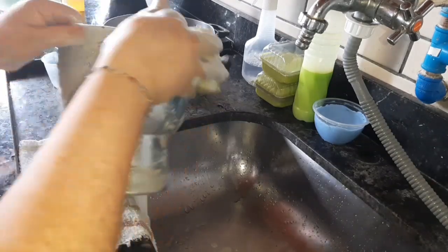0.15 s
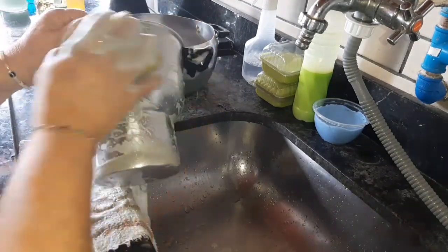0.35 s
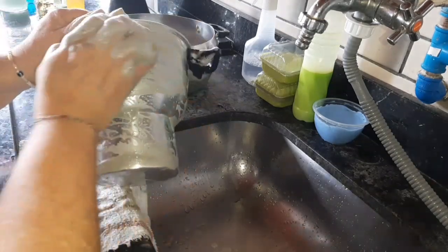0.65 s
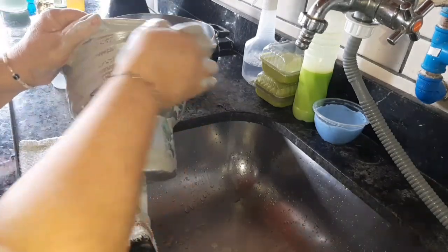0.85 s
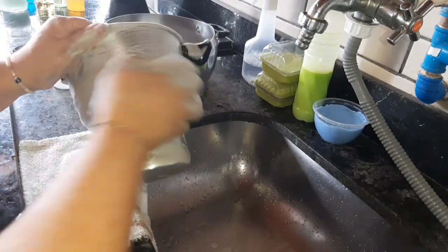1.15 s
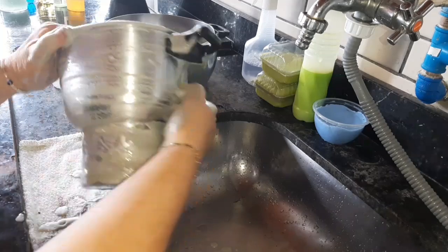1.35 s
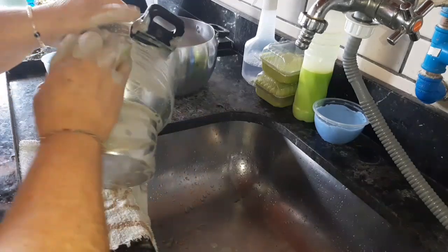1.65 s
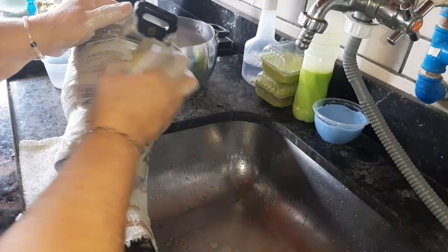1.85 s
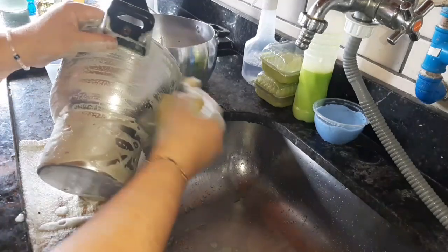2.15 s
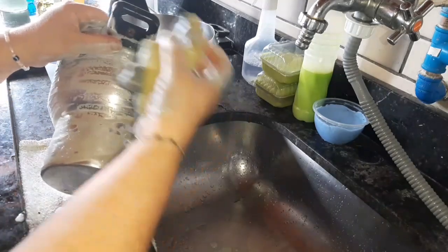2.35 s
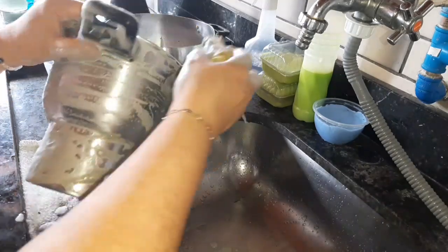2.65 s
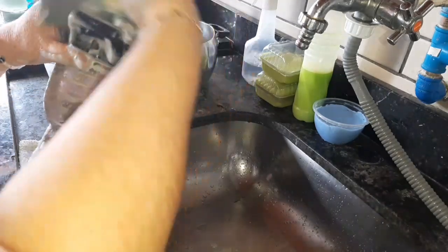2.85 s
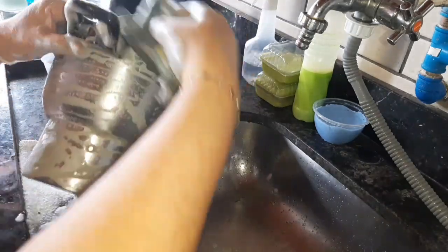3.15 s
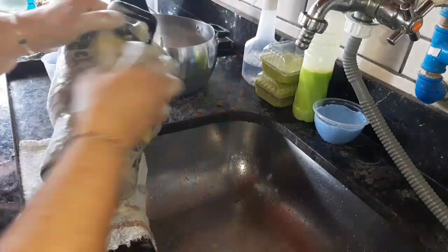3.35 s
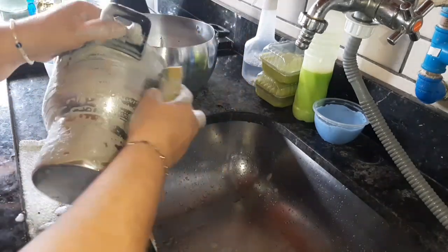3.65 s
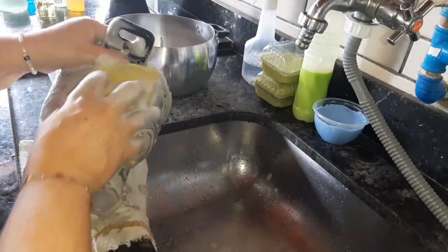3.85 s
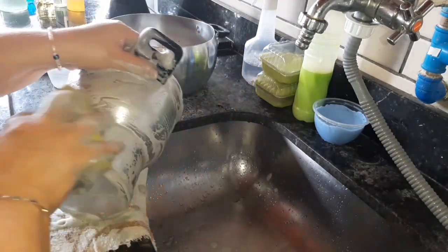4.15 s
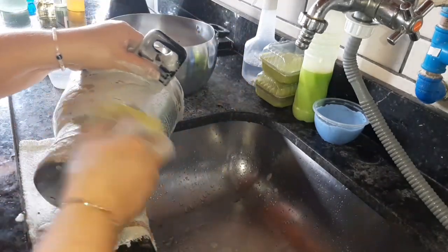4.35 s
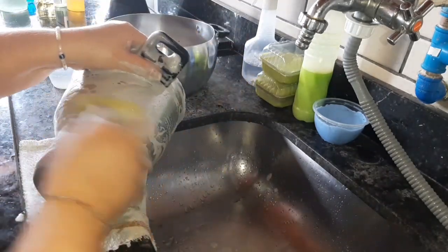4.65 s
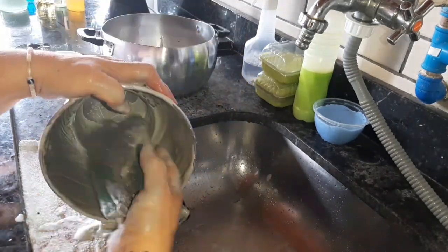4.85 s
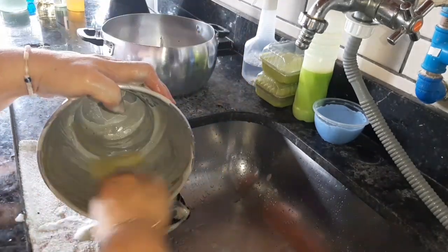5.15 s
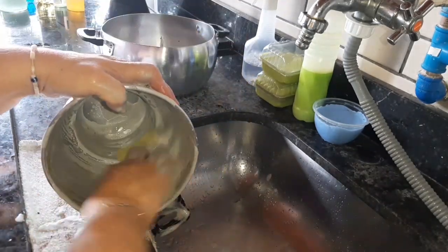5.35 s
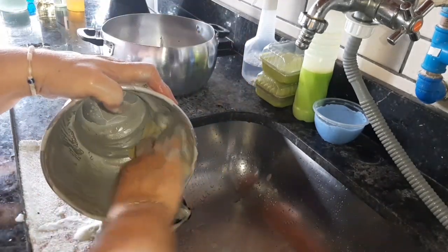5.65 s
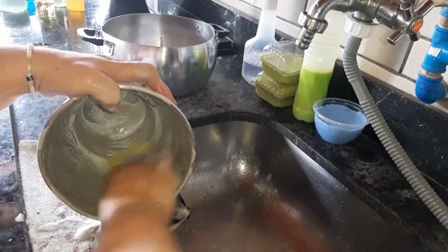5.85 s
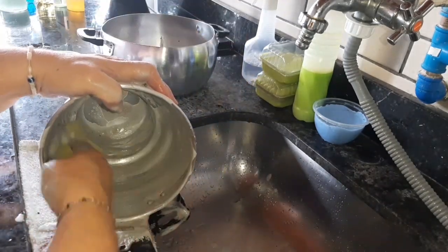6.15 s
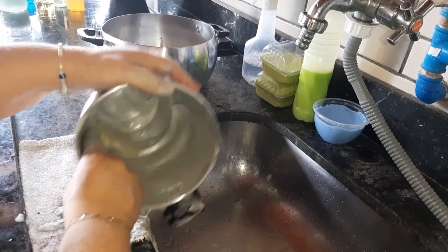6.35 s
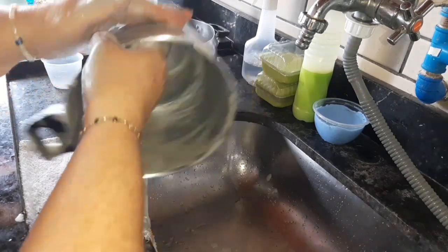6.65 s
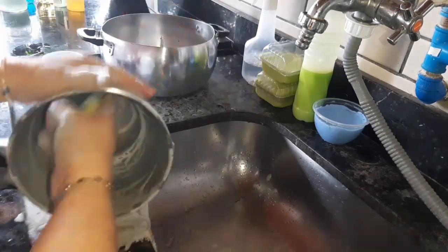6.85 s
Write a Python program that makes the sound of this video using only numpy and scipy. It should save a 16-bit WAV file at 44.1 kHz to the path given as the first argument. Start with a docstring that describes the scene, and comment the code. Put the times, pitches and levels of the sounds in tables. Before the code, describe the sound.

Quick, raspy scouring of a damped metal pot, several strokes a second, with short scratches and frequent hollow clanks. Around the middle the strokes thin out to handling and knocks, then return. A tiny gap precedes steadier, louder hissing strokes with a hollow pot resonance and fewer clanks. The pot is finally turned and set down hard. Close stereo microphone in a small, hard-walled kitchen.

```python
"""Steel wool hisses in quick uneven strokes on a wet metal pot at a kitchen sink, close to a two-port microphone.
Friction is filtered noise: dense random slips of the wires, a judder of the pot wall, short scratches.
The counter rumbles under the arm; the pot rocks on it and clanks, each blow exciting damped shell modes.
The pot is put down at the end with a heavy knock, a sum of counter modes; tiled walls add a short tail."""
import sys
import numpy as np
from scipy import signal
from scipy.fft import rfft, irfft
from scipy.io import wavfile

SR = 44100
rng = np.random.default_rng(int(sys.argv[2]) if len(sys.argv) > 2 else 0)


def wrap_up_sound(samples):
    """Save the sound to the file named by the first command line argument, as 16-bit audio."""
    columns = np.atleast_2d(samples).T
    # keep every value between -1 and 1, then stretch to whole-number steps
    tamed = np.clip(columns, -1, 1)
    steps = np.round(tamed * 32767).astype(np.int16)
    wavfile.write(sys.argv[1], SR, steps)


N = 308170  # samples

# Table levels are relative: source trims, fluctuations and the port response act after them.
# strokes of the pad: (middle [s], length [s], wire hiss level [dB], coarse rasp above the hiss [dB])
STROKES = [(0, 0.14, -60.5, 10), (0.277, .21, -53, 8), (0.437, 0.15, -48, 1.5), (0.593, .15, -46, 0.5),
           (0.772, .17, -45.5, 3.5), (0.972, 0.18, -47, 2.5), (1.172, 0.34, -46.5, -0.5),
           (1.452, 0.19, -51.5, 4), (1.616, 0.18, -49.5, 4.5), (1.78, 0.16, -45.5, 3.5),
           (1.93, .14, -45.5, 5.5), (2.085, 0.15, -45, 2.5), (2.243, .11, -63, 10),
           (2.588, 0.26, -59, 12.5), (2.882, .27, -63, 10.5), (3.104, 0.22, -56, 12.5),
           (3.403, .16, -51, 7), (3.587, .16, -45, 3.5), (3.825, .35, -49, 5.5), (4.12, .25, -45.5, 2),
           (4.353, 0.17, -45, 2.5), (4.528, 0.15, -45.5, 4), (4.675, 0.12, -47, 1), (4.81, 0.25, -59, 4),
           (5.121, 0.059, -49.5, 4), (5.253, .19, -42, 0.5), (5.441, 0.16, -42.5, -0.5),
           (5.603, 0.16, -44.5, 1.5), (5.79, 0.13, -43, 2.5), (5.938, .13, -43.5, 0.5),
           (6.146, 0.21, -41.5, 0.5), (6.352, 0.15, -51.5, 5), (6.48, 0.22, -59.5, 10.5),
           (6.683, 0.25, -66, 11), (6.98, 0.11, -51.5, 10)]
# wires scratching in the pot: (frequency [Hz], density [dB per Hz])
WIRE_SPECTRUM = [(600, -3), (1500, -1), (2200, -2), (3500, -4), (5500, -3.5), (7000, -2.5), (8800, -4.5),
                 (10000, -2), (11500, 0.5), (13500, -1), (15500, -2)]
# the hollow stirred by scouring inside the pot: (time [s], level relative to the hiss [dB])
HOLLOW_LEVEL = [(0, -29), (4.7, -17), (5.1, -14.5), (5.45, -1), (5.75, -13), (6.3, -3.5), (6.9, 10)]
# resonance of that hollow: (frequency [Hz], density [dB per Hz])
HOLLOW_SPECTRUM = [(100, -55), (290, -32), (370, 7.5), (440, 6), (560, -3.5), (720, -25), (2000, -40)]
# pad bearing on the pot: (time [s], rubbing level of the wall [dB])
PAD_PRESSURE = [(0.0, -48.5), (0.54, -51), (0.93, -41), (1.15, -48), (1.4, -51.5), (1.73, -40),
                (2.02, -39.5), (2.24, -53.5), (3.35, -52), (3.68, -47.5), (4.49, -48), (4.75, -55.5),
                (5.12, -55.5), (5.27, -52), (6.01, -50), (6.99, -55.5)]
# rubbed pot wall: (frequency [Hz], density [dB per Hz])
WALL_SPECTRUM = [(130, -29), (280, 5), (430, 0.5), (620, -0.5), (850, -3), (1200, -10), (1800, -9),
                 (2600, -21), (4000, -21.5), (8000, -24.5), (16000, -70)]
# arm leaning on the counter: (time [s], rumble level [dB])
ARM_LEAN = [(0, -51.5), (.85, -45), (1.25, -49), (1.95, -40.5), (2.3, -46.5), (2.8, -47.5), (3.7, -44),
            (4.6, -45.5), (4.9, -55.5), (5.2, -47), (6.3, -49), (6.9, -52)]
# pushed counter: (frequency [Hz], density [dB per Hz])
RUMBLE_SPECTRUM = [(20, -44), (35, -19), (58, -6), (100, 1), (145, -4), (195, -17), (300, -26), (600, -47),
                   (2000, -88)]
# bursts of friction, from scratching wires to the dragging foot of the pot; the row at 0.218 s is the bright
# edge of the clank at 0.215 s, and the row at 1.97 s is the low click of a blow: (middle [s], length [s],
# centre [Hz], bandwidth [Hz], level [dB])
SCRATCHES = [(.02, .05, 415, 224, -45), (.218, .02, 2690, 940, -34.5), (1.104, 0.099, 550, 202, -43.5),
             (1.454, .054, 4360, 2200, -46.5), (1.97, 0.046, 323, 300, -37),
             (1.971, 0.016, 4440, 4500, -39), (2.486, 0.049, 4300, 2500, -52),
             (3.762, .02, 4000, 4040, -42), (3.85, .6, 288, 70, -50), (5.466, 0.18, 1840, 900, -49),
             (5.974, 0.018, 13100, 1990, -40), (6.749, .01, 6000, 7000, -57)]
# clanks of the pot: (time [s], level [dB], hollow body [dB], wall clang [dB], rim click [dB],
# note that the grip leaves free [Hz], level of that note [dB])
CLANKS = [(0.1956, -35.5, -15, -3, 0, 495, 4), (0.215, -22.5, -1, 4.5, 3, 472, -9),
          (0.2632, -30, -11, -2, -16, 468, 4), (0.381, -37.5, -1, -5, 0, 810, -14),
          (0.4885, -34.5, 15, -2, 9, 477, -18), (0.4971, -31.5, 0.5, -2, 2, 486, 3),
          (0.5322, -25.5, -2, 0, 1.5, 1770, -4), (0.6147, -39, -6, -9, 1, 463, -3),
          (0.7106, -28.5, 7.5, -7, -3, 480, -15), (0.7254, -29.5, 2, 2.5, -16, 475, 3),
          (0.819, -28, 13.5, -1, 5, 480, -23), (0.8254, -27.5, -3, -4, 5, 454, 1),
          (0.9183, -36, 2, 4, -11, 450, -12), (0.9769, -34, 8, -5, 3, 470, -18),
          (0.9861, -24, 3.5, 6, 3.5, 1780, -16), (1.334, -30, -8, 7.5, 9, 473, -20),
          (1.3471, -34.5, 11, -4, 11, 458, 1), (1.4987, -25, -3.5, -3, -4, 480, -7),
          (1.6375, -27, 0, -10, 2.5, 469, -14), (1.788, -19, -4, -2.5, -6, 829, -24),
          (1.7979, -30, 16, -11, 3, 478, 9), (1.8792, -23.5, -6, -5, -14, 813, -18),
          (2.0203, -30.5, 7, -1, 4, 472, -12), (2.06, -20, -2.5, -2.5, -6.5, 448, -5),
          (2.1559, -24, -6, 5, -1.5, 1990, -12), (2.484, -36.5, 9.5, 4, 10, 382, -3),
          (2.6004, -24, -6.5, 4.5, 6, 1925, -12), (2.8875, -42, 2.5, -8, 2, 474, -14),
          (2.995, -25, -6, -2.5, -6, 488, -1), (3.1911, -35, -6, -7.5, -9, 485, 5),
          (3.3765, -36.5, -7, -13, -3, 490, -14), (3.3993, -23.5, -3.5, -2, -6, 827, -12),
          (3.6129, -22.5, 2.5, 3.5, 5.5, 1695, -13), (3.8604, -34.5, -4.5, 1, 7.5, 290, 0),
          (5.0968, -33, 8.5, -20, 6.5, 429, 1), (5.6566, -36, 11, -1, -11, 478, -15),
          (5.6711, -30.5, -2, -9, -9, 418, 6), (5.8158, -24.5, -0.5, -0.5, 8, 458, -10),
          (5.9734, -37, 27, 10, 2, 424, 3), (6.1497, -27.5, 3.5, 1, 5.5, 446, -3),
          (6.369, -25, 5, 4, 17.5, 473, -16), (6.3762, -21.5, 2, -2, -18, 470, 3.5),
          (6.3834, -21, -29, -1, -2.5, 1830, -3), (6.4105, -22.5, -6, -2.5, -13, 451, 2.5),
          (6.4708, -39.5, -3, -11, -6, 432, -9), (6.5254, -35, -6, 2.5, -17, 449, 0),
          (6.9241, -21, -4.5, -2.5, 0.5, 456, 0)]
# shell struck by a blow: (frequency [Hz], response [dB])
SHELL_RESPONSE = [(50, -38.5), (150, -10), (300, -3.5), (490, 1), (620, -2.5), (900, -7), (1250, -9.5),
                  (1950, -5.5), (2300, -10.5), (3500, -22), (6000, -29), (10000, -40), (16000, -41)]
# modes of the damped pot, before each blow scatters pitch and level: (frequency [Hz], level [dB], t60 [s])
POT_MODES = [(301, -12, .2), (441, -5, .13), (482, -2, .14), (527, -7, .12), (669, -8, .14), (824, -1, .17),
             (984, -3, .15), (1157, -16, .14), (1460, -14, .12), (1685, -4, .17), (1813, -2, .17),
             (1955, -4, .16), (2465, -15, .18), (3935, -24, .2)]
# dying of the free note: (frequency [Hz], t60 [s])
NOTE_DECAY = [(450, 0.13), (830, 0.37), (1900, 0.15)]
# blows on the counter: (time [s], level [dB], contact hardness as a cut-off [Hz],
# t60 of the extra damping by the hand [s], left minus right [dB])
THUMPS = [(3.7765, -26, 223, 0.047, 0), (6.923, -15.5, 795, 4, 1)]
# modes of the counter with the pot on it, before that damping: (frequency [Hz], level [dB], t60 [s])
COUNTER_MODES = [(103, -12, .3), (150, -14, .18), (200, -13, .12), (325, -15, .13), (415, 0, .075),
                 (520, -9, .06)]
# reverberation of the kitchen: (frequency [Hz], t60 [s])
KITCHEN_DECAY = [(100, 0.79), (500, 0.32), (2000, 0.26), (6000, 0.15), (15000, 0.079)]
# coherence of the two ports: (frequency [Hz], likeness [ratio, clipped to 0-1])
PORT_LIKENESS = [(100, 0.76), (400, 1.36), (900, 0.3), (1800, 0), (3500, 0.15), (8000, -0.5)]
# level difference of the ports: (frequency [Hz], left minus right [dB])
PORT_BALANCE = [(50, 11.5), (130, 2), (380, 6), (900, 4.5), (1800, 2.5), (4000, 2), (8000, 0.5),
                (12000, -1.5)]
# brief dip of the whole sound: (time [s], gain [dB])
LEVEL_DIP = [(4.715, 0.5), (4.745, -16), (4.76, -48), (4.772, -45), (4.785, -14), (4.803, 1)]

REST_DB, REST_RASP_DB = -74.5, 10  # pad shifting in the hand between strokes; its rasp above that [dB]
TURN_DB, STROKE_SHAPE = -9, 3.2  # drop of the hiss where the hand turns [dB]; a higher power is flatter
BELLY_TOP_HZ, BELLY_SAG_PER_S = 600, 0.55  # notes below this sink by this share of their pitch per s
PORT_DELAY = 8  # lag of the right port [samples]
EDGE_HZ = 15750  # upper band limit [Hz]


def amp(db):
    """Logarithmic level: converts decibels to an amplitude ratio."""
    return 10 ** (np.asarray(db) / 20)


def unit(x):
    """Normalisation: scales a signal to an rms of one."""
    return x / np.sqrt(np.mean(x ** 2) + 1e-20)


def read(points, hz):
    """Logarithmic pitch: interpolates a table along log frequency."""
    f, value = np.transpose(points)
    return np.interp(np.log(hz + 1), np.log(f + 1), value)


def curve(rows):
    """Envelope: interpolates levels in dB into a gain at every sample."""
    time, db = np.transpose(rows)
    return amp(np.interp(np.arange(N) / SR, time, db))


def add(mix, s, sound):
    """Superposition: adds a stereo sound to the mix at time s."""
    part = mix[:, round(s * SR):][:, :sound.shape[1]]
    part += sound[:, :part.shape[1]]


def wander(hz):
    """Low-passed chance: a random fluctuation of unit rms, up to about hz."""
    f = np.fft.rfftfreq(N, 1 / SR)
    noise = rfft(rng.standard_normal(N))
    return unit(irfft(noise / (1 + (f / hz) ** 4), N))


def ports(pair):
    """Partial coherence: mixes two unrelated signals so that the ports agree in the bass, the right later."""
    size = pair.shape[1]
    hz = np.fft.rfftfreq(size, 1 / SR)
    first, second = rfft(pair)
    like = np.clip(read(PORT_LIKENESS, hz), 0, 1)
    lag = np.exp(-2j * np.pi * hz * PORT_DELAY / SR)
    right = like * first * lag + np.sqrt(1 - like ** 2) * second
    return irfft(np.array([first, right]), size)


def both_ports(left):
    """Propagation delay: the right port hears the same wave a little later."""
    return np.array([left, np.pad(left, (PORT_DELAY, 0))[:len(left)]])


def colour(x, spectrum):
    """Spectral shaping: filters a full-length signal without phase shift, to unit rms."""
    gain = amp(read(spectrum, np.fft.rfftfreq(N, 1 / SR)))
    return unit(irfft(rfft(x) * gain, N))


def causal(x, gain_db, size=2048):
    """Minimum phase: filters by gain_db(hz) with no response ahead of its cause."""
    log_gain = np.log(amp(gain_db(abs(np.fft.fftfreq(size, 1 / SR)))))
    # the phase follows from the log gain by a Hilbert transform
    taps = np.fft.ifft(np.exp(np.conj(signal.hilbert(log_gain)))).real
    return signal.fftconvolve(x, taps[None], axes=1)[:, :x.shape[1]]


def butter(order, hz, kind):
    """Maximally flat passband: designs a Butterworth filter."""
    return signal.butter(order, hz, kind, fs=SR, output="sos")


def slips(per_s, spread_db):
    """Stick-slip friction: tiny catches and releases make clicks of uneven size at random instants."""
    size = amp(spread_db * np.minimum(rng.exponential(1, (2, N)), 4))
    happens = rng.random((2, N)) < per_s / SR
    return ports(size * rng.standard_normal((2, N)) * happens)


def strokes():
    """Reciprocating motion: one arch of power per stroke; returns gains of fine hiss and coarse rasp."""
    t = np.arange(N) / SR
    fine = np.full(N, amp(REST_DB) ** 2)
    coarse = np.full(N, amp(REST_DB + REST_RASP_DB) ** 2)
    for middle, length, db, rasp_db in STROKES:
        near = abs(t - middle) < 2 * length
        from_middle = abs(2 * (t[near] - middle) / length)  # 1 where the hand turns
        power = amp(db + TURN_DB * from_middle ** STROKE_SHAPE) ** 2
        fine[near] += power
        coarse[near] += power * amp(rasp_db) ** 2
    return np.sqrt(fine), np.sqrt(coarse)


def scouring():
    """Friction noise: dense slips hiss, sparse ones tick, and the stirred hollow resonates with the strokes."""
    hiss = colour(slips(per_s=16000, spread_db=-2.0), WIRE_SPECTRUM) * amp(3.5 + 0.77 * wander(hz=59))
    rasp = signal.sosfiltfilt(butter(2, 5000, "low"), hiss)
    ticks = colour(slips(per_s=110, spread_db=-1.0), WIRE_SPECTRUM) * amp(-10.5)
    hollow = colour(slips(per_s=1300, spread_db=0.5), HOLLOW_SPECTRUM)
    hollow = hollow * curve(HOLLOW_LEVEL) * amp(1.4 * wander(hz=25))
    fine, coarse = strokes()
    return fine * (hiss - rasp + ticks + hollow) + coarse * rasp


def shell_peaks(hz, peak_db, width_hz):
    """Resonance: the response of the pot rises near its modes; returns dB at each frequency."""
    centres = np.array(POT_MODES)[:, :1]
    return peak_db * np.exp(-((hz - centres) / width_hz) ** 2).max(0)


def rubbing():
    """Forced vibration: the pad judders over the pot wall and the push of the arm rumbles in the counter."""
    judder = causal(slips(per_s=2500, spread_db=0.0), lambda hz: shell_peaks(hz, peak_db=0.5, width_hz=22))
    wall = colour(judder, WALL_SPECTRUM) * amp(-1.5 + 1.43 * wander(hz=29))
    push = ports(rng.standard_normal((2, N)))
    counter = colour(push, RUMBLE_SPECTRUM) * amp(-0.5 + 1.76 * wander(hz=14))
    return wall * curve(PAD_PRESSURE) + counter * curve(ARM_LEAN)


def scratches():
    """Band-limited friction: short swells of noise around one frequency."""
    out = np.zeros((2, N))
    for middle, length, hz, width_hz, db in SCRATCHES:
        size = round(length * SR)
        edges = np.clip([hz - width_hz / 2, hz + width_hz / 2], 60, 20000)
        noise = ports(rng.standard_normal((2, SR)))
        grit = signal.sosfilt(butter(2, edges, "band"), noise)[:, :size]
        swell = unit(grit * np.hanning(size))
        add(out, max(middle - length / 2, 0), amp(db) * swell)
    return out


def ring(modes, t):
    """Modal superposition: sums exponentially dying sine waves."""
    hz, db, t60 = np.transpose(modes)[:, :, None]
    left = (amp(db - 60 * t / t60) * np.sin(2 * np.pi * hz * t)).sum(0)
    return both_ports(left)


def attack_level(x, size=700):
    """Attack loudness: the rms of the first samples of a blow."""
    return np.sqrt(np.mean(x[:, :size] ** 2))


def free_note(hz, db, t):
    """Undamped mode: one note that the hand leaves free; notes of the belly sink a little as they die."""
    pitch = hz * (1 - BELLY_SAG_PER_S * t * (hz < BELLY_TOP_HZ))
    phase = 2 * np.pi * np.cumsum(pitch) / SR
    return both_ports(amp(db - 60 * t / read(NOTE_DECAY, hz)) * np.sin(phase))


def pot_ring(t):
    """Point of excitation: each blow lands elsewhere, and the gripping hand shifts the modes a little."""
    shift, size = rng.standard_normal((2, len(POT_MODES)))
    hz, db, t60 = np.transpose(POT_MODES)
    return ring(np.transpose([hz * (1 + .007 * shift), db + 4 * size, t60]), t)


def clank(body_db, clang_db, click_db, note_hz, note_db, crash_t60=0.079, crash_db=-21,
          chatter_t60=0.018, chatter_db=-18, modes_db=-10):
    """Impact: a blunt push, gritty chatter and a crash of crowded shell modes; a few modes ring on."""
    t = np.arange(SR // 2) / SR
    push = np.zeros((2, len(t)))
    push[[0, 1], [0, PORT_DELAY]] = 1
    chatter = ports(rng.standard_normal(push.shape)) * amp(chatter_db - 60 * t / chatter_t60)
    crash = ports(rng.standard_normal(push.shape)) * amp(crash_db - 60 * t / crash_t60)
    blunt_push = signal.sosfilt(butter(2, 2300, "low"), push)
    sharp_chatter = signal.sosfilt(butter(2, 2300, "high"), chatter)
    strike = blunt_push + sharp_chatter + crash
    shell = causal(strike, lambda hz: read(SHELL_RESPONSE, hz) + shell_peaks(hz, peak_db=2.5, width_hz=43))
    modes = pot_ring(t)
    sound = shell / attack_level(shell) + amp(modes_db) * modes / attack_level(modes)
    # balance of body, clang and click: (frequency [Hz], gain [dB])
    contact = [(550, body_db), (780, 0), (1300, 0), (1650, clang_db), (2100, clang_db), (2850, click_db)]
    sound = causal(sound, lambda hz: read(contact, hz))
    sound = sound / attack_level(sound) + free_note(note_hz, note_db, t)
    return sound / attack_level(sound)


def clanks():
    """Repeated impact: the pot rocks against the counter as it is scoured and turned."""
    out = np.zeros((2, N))
    for s, db, *tone in CLANKS:
        add(out, s, amp(db) * clank(*tone))
    return amp(-0.98) * out


def thumps():
    """Contact stiffness: the pot's weight lands on the counter; a soft contact reaches only low modes."""
    out = np.zeros((2, N))
    t = np.arange(SR // 2) / SR
    for s, db, hardness_hz, damping_t60, pan_db in THUMPS:
        damped = ring(COUNTER_MODES, t) * amp(-60 * t / damping_t60)
        sound = signal.sosfilt(butter(2, [85, hardness_hz], "band"), damped)
        sides_db = db + np.array([[pan_db], [-pan_db]]) / 2
        add(out, s, amp(sides_db) * sound / attack_level(sound))
    return out


def kitchen(x, gap_s=.006):
    """Reverberation: tiled walls return a short diffuse tail that dies faster in the treble."""
    hz, t, z = signal.stft(ports(rng.standard_normal((2, SR // 2))), SR, nperseg=256)
    decay = amp(-60 * t / read(KITCHEN_DECAY, hz)[:, None])
    tail = signal.istft(z * decay, SR, nperseg=256)[1]
    tail = np.pad(tail / np.linalg.norm(tail[0]), ((0, 0), (round(gap_s * SR), 0)))
    return signal.fftconvolve(x, tail, axes=1)[:, :N]


def scene():
    """Direct and reflected sound: friction and blows, with their kitchen tail; the rubbing stays dry."""
    friction = scouring() + scratches()
    rub = rubbing()
    blows = clanks() + thumps()
    return friction + rub + blows + kitchen(amp(-11) * blows + amp(-11.5) * friction)


def record(dry):
    """Port response: unequal port levels, a cut of the deepest bass, a brief level dip and an upper band limit."""
    tilt_db = read(PORT_BALANCE, np.fft.rfftfreq(N, 1 / SR))
    sides = amp(np.array([tilt_db, -tilt_db]) / 2)
    sides = sides / np.sqrt((sides ** 2).mean(0))  # keeps the mean power of the two gains at one
    heard = irfft(rfft(dry, axis=1) * sides, N)
    heard = signal.sosfilt(butter(2, 36, "high"), heard) * curve(LEVEL_DIP)
    edge = signal.firwin(511, EDGE_HZ, window=("kaiser", 9), fs=SR)
    return signal.oaconvolve(heard, edge[None], "same", axes=1)


dry = scene()
out = record(dry)
wrap_up_sound(out)
```